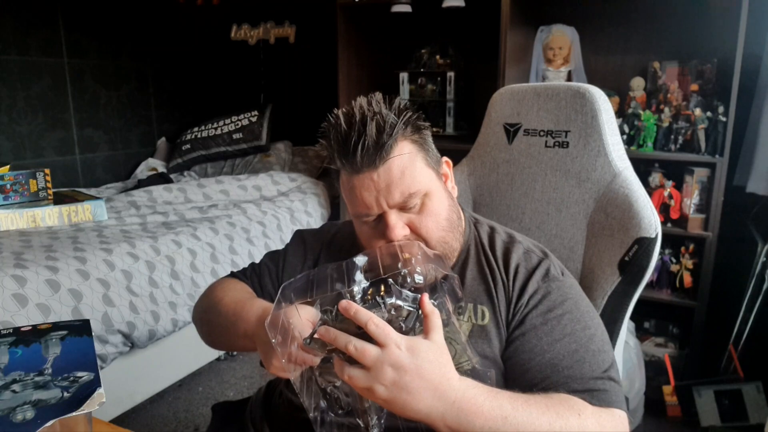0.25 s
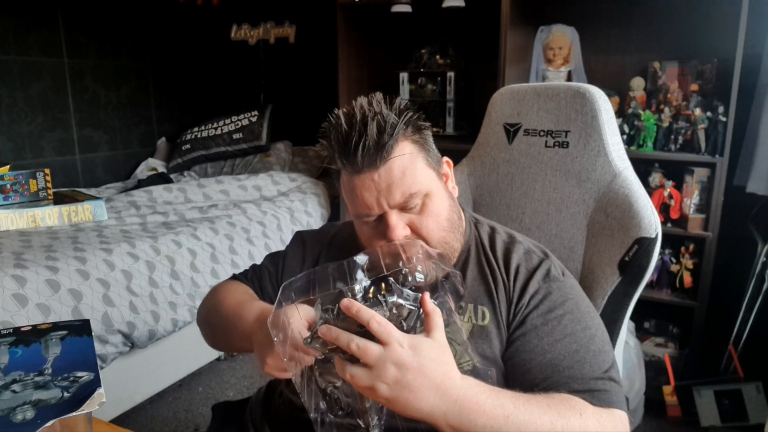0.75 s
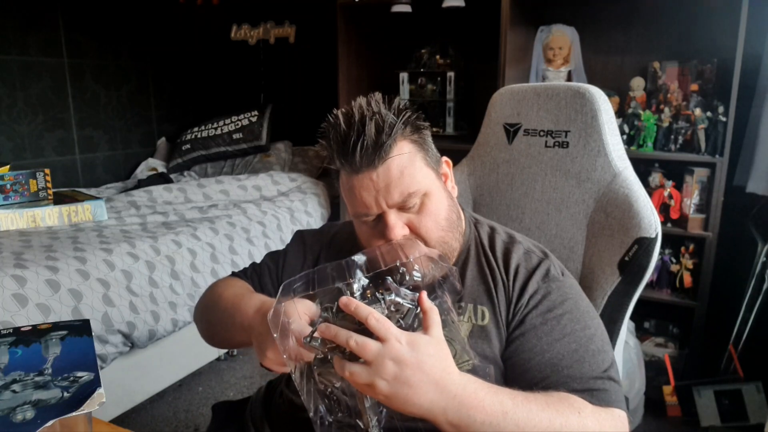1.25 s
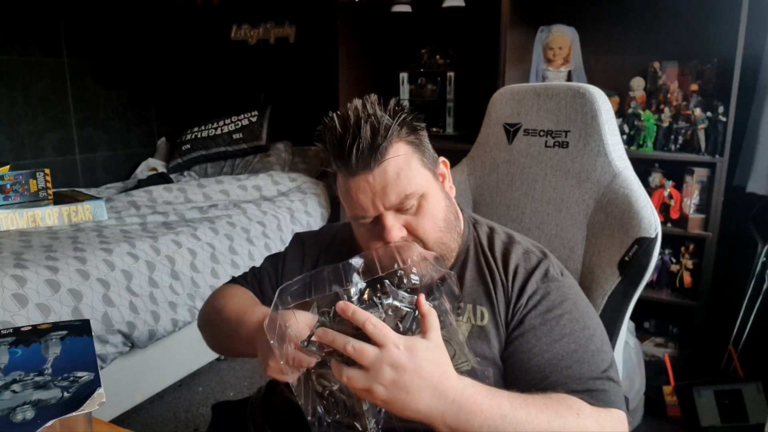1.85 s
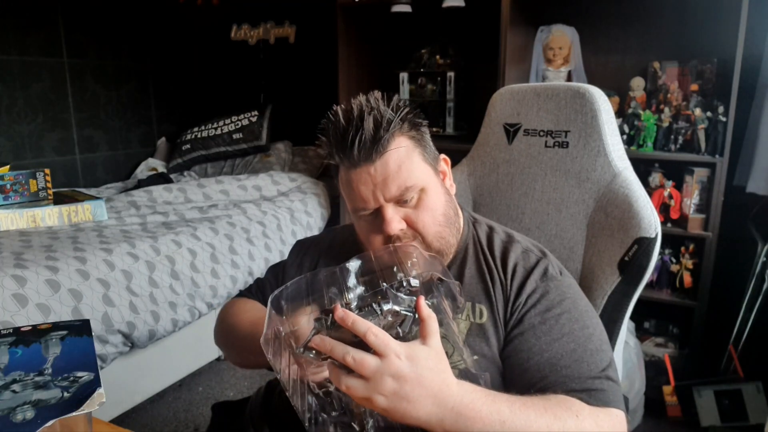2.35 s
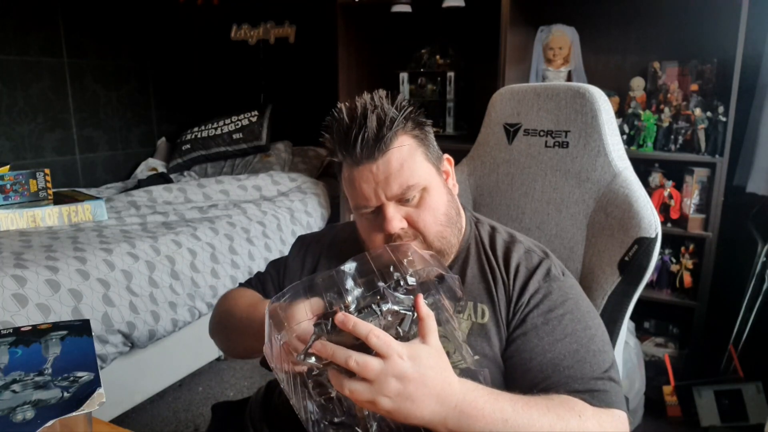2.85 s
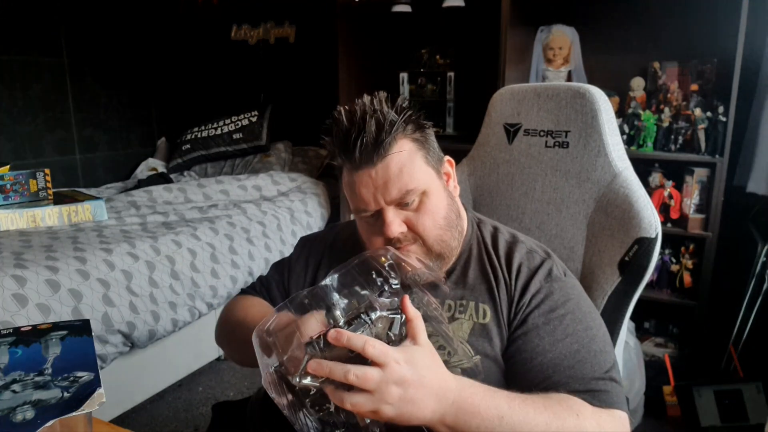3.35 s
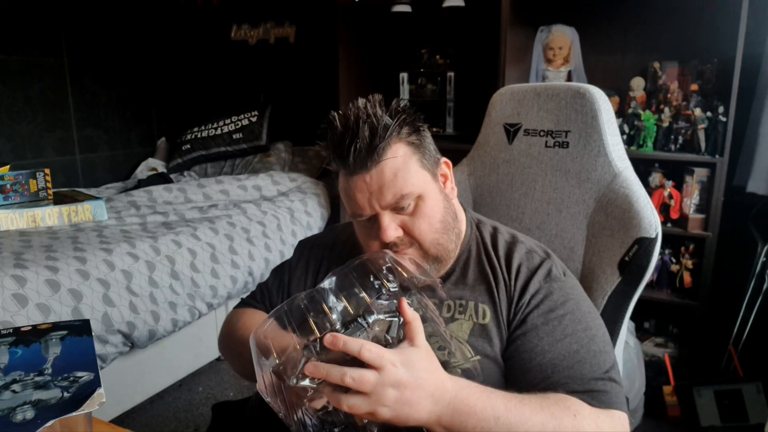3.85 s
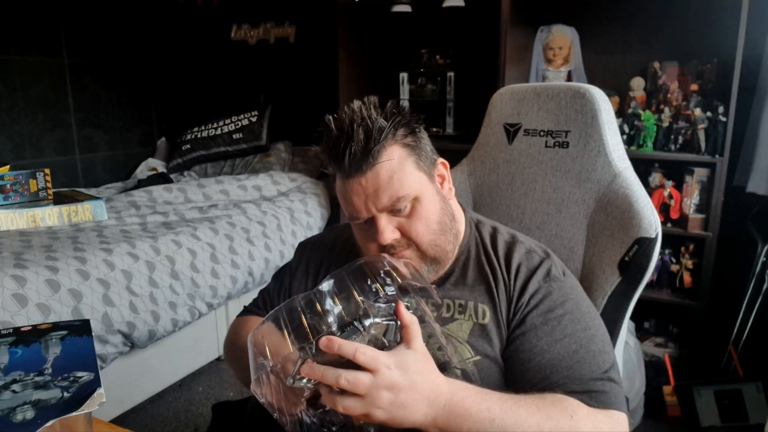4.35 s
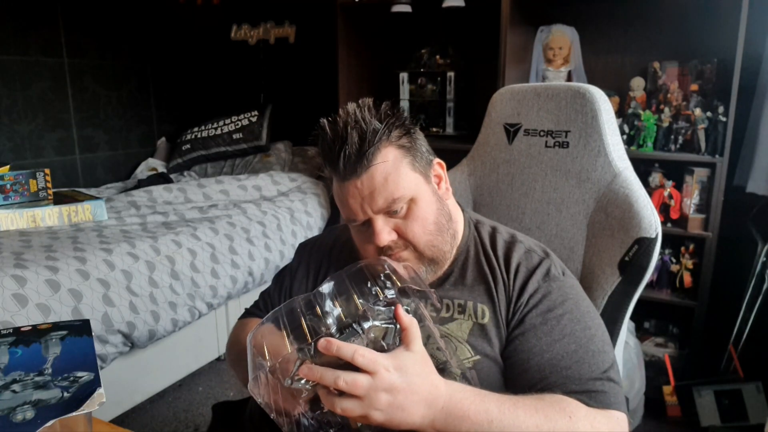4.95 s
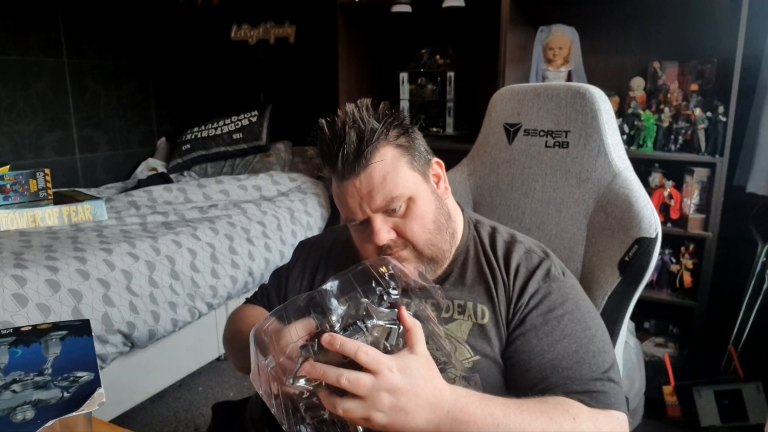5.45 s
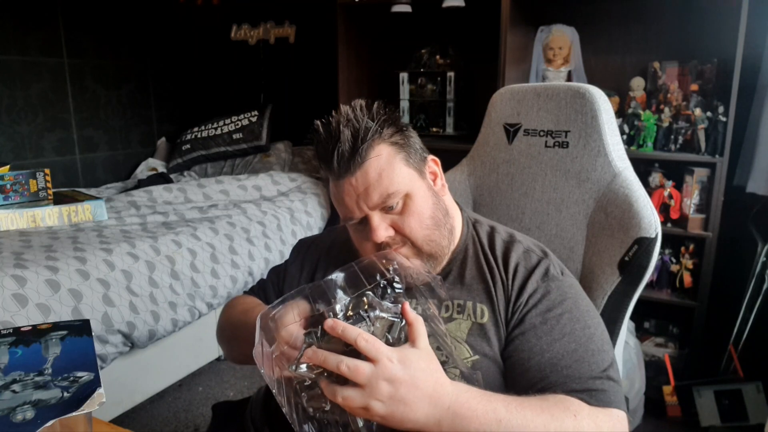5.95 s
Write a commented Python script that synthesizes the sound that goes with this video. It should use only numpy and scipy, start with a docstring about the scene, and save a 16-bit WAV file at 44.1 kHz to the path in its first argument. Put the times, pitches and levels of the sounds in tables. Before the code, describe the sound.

Stiff clear plastic packaging crackles, pops and snaps as it is flexed and cut, close up, over a low computer hum.

```python
"""Cutting open a plastic shell pack

Close up at a desk in a small furnished room, in stereo: a stiff clear pack is gripped, flexed and cut.
Its walls buckle in snaps and dull pops that leave a panel ringing briefly; with each push of the hands
the blade and fingers grate finely on the sheet. A computer and its fans hum in the background."""
import sys
import numpy as np
from scipy import signal
from scipy.fft import rfft, irfft
from scipy.io import wavfile
from scipy.ndimage import map_coordinates

SR = 44100
rng = np.random.default_rng(int(sys.argv[2]) if len(sys.argv) > 2 else 0)


def bounce(signal):
    """Save signal as a 16-bit WAV file at the path given by the first command-line argument."""
    frames = np.transpose(np.atleast_2d(signal))
    limited = np.clip(frames, -1, 1)
    pcm = np.round(limited * 32767).astype(np.int16)
    wavfile.write(sys.argv[1], SR, pcm)


N = 273619
TIME = np.arange(N) / SR
SNAP_TIME, TAIL_TIME = TIME[:int(0.12 * SR)], TIME[:int(0.4 * SR)]
EDGES_HZ = 16000 / 2 ** (np.arange(19, -1, -1) / 2)   # half octaves
SHEET_EDGES_HZ = EDGES_HZ[5:]   # from 125 Hz up


def from_db(db):
    return 10 ** (np.asarray(db) / 20)


def unit_energy(x):
    """Scales each row to a sum of squares of one."""
    return x / np.sqrt(np.sum(x ** 2, axis=-1, keepdims=True) + 1e-20)


def at_hz(points, hz):
    """Reads a table on a log-frequency axis."""
    table = np.array(points)
    return np.interp(np.log(hz), np.log(table[:, 0]), table[:, 1])


def fade(t, t60):
    """Falls by 60 dB in t60 seconds."""
    return np.exp(-np.log(1000) * t / t60)


def mode(t, hz, energy_db, t60):
    """One resonance ringing down."""
    return from_db(energy_db) * unit_energy(np.sin(2 * np.pi * hz * t) * fade(t, t60))


def bands(edges):
    """Yields each band's centre, filter and share of white noise amplitude."""
    for k, (low, high) in enumerate(zip(edges, edges[1:])):
        sos = signal.butter(2, [low, high], "band", fs=SR, output="sos")
        sos[0, :3] *= (-1) ** k   # alternate signs so that neighbours add up
        yield np.sqrt(low * high), sos, np.sqrt(2 * (high - low) / SR)


def drift(per_s):
    """A smooth random curve with a spread near one."""
    knots = rng.standard_normal(1024)
    return map_coordinates(knots, [TIME[::64] * per_s], order=3, mode="wrap").repeat(64)[:N]


def stereo(mid, side, correlation):
    """Left and right with the given correlation."""
    return np.sqrt((1 + correlation) / 2) * mid + np.sqrt((1 - correlation) / 2) * np.array([side, -side])


def add(track, s, sound):
    """Mixes a sound into a track at a given second."""
    start = max(round(s * SR), 0)
    part = sound[..., :N - start]
    track[..., start:start + part.shape[-1]] += part


# The computer, in the background. Each row: pitch in Hz, level in dB, unsteadiness from 0 to 1.
MOTOR_TONES = [(49.8, -63, 0.2), (77.9, -63.5, 0), (120, -57.5, .12), (263.6, -71, 0.4), (363.6, -70, 0),
               (560, -87.5, .4)]


def computer_hum(waver_per_s=7):
    """Motors and fans hum in the centre, some tones steady, some wavering."""
    hum = np.zeros(N)
    for hz, db, unsteady in MOTOR_TONES:
        waver = 1 + unsteady * (drift(waver_per_s) + 1j * drift(waver_per_s))
        tone = np.real(waver * np.exp(2j * np.pi * (hz * TIME + rng.random())))
        hum += from_db(db) * tone / np.sqrt(0.5 + unsteady ** 2)
    return hum


# Room tone around the microphones. Each row: frequency in Hz, spectral level in dB.
ROOM_TONE = [(22, -70), (30, -61), (46, -37), (68, -30.5), (100, -43), (160, -40), (230, -47), (380, -46.5),
             (500, -59.5), (750, -64.5), (1100, -67), (2200, -73), (4400, -76.5), (8000, -87.5),
             (15000, -79.5)]


def room_air(alike_below_hz=900):
    """A dull rush of air, alike at both microphones in the bass and wide above."""
    rush = np.zeros((2, N))
    for hz, sos, share in bands(EDGES_HZ):
        noise = signal.sosfilt(sos, signal.sosfilt(sos, rng.standard_normal((2, N))))
        mid, side = np.sqrt(N) * unit_energy(noise)
        correlation = 0.9 / (1 + (hz / alike_below_hz) ** 2)
        rush += share * from_db(at_hz(ROOM_TONE, hz)) * stereo(mid, side, correlation)
    return rush


# Hands at work near the microphones. Each row: peak time in seconds, grating level in dB at the pack,
# length in seconds.
HAND_PUSHES = [(0.005, -56, 0.14), (0.684, -56.5, 0.29), (1.041, -57.5, 0.57), (1.37, -66, .55),
               (1.563, -55, 0.17), (1.915, -51, 0.12), (3.03, -60.5, 0.5), (3.41, -56.5, 0.33),
               (4.15, -80, 0.17), (4.362, -54, 0.33), (4.968, -52, 0.27), (5.528, -67.5, .38),
               (5.67, -57.5, 0.27), (5.878, -65, 0.18)]


def hand_pressure(hold_db=-86.5, swell_share=0.45, range_db=25):
    """The grating's gain: every push swells and eases again over a light steady hold."""
    gain = from_db(hold_db)
    for peak_s, db, length_s in HAND_PUSHES:
        along = (TIME - peak_s) / length_s
        off_peak = np.maximum(-along / swell_share, along / (1 - swell_share))
        gain = gain + from_db(db - range_db * off_peak)
    return gain


# Blade and fingers on the sheet, close up. Each row: frequency in Hz, relative spectral level in dB.
GRATING_SPECTRUM = [(130, -3.5), (350, 8), (850, 5), (1800, -10), (4000, -15.5), (6500, -21), (8000, -33),
                    (15000, -33.5)]


def grating(slips_per_s=700, size_db=4.0):
    """Tiny slips of the blade and fingers, in clumps, each a click coloured by the sheet."""
    slipping = rng.random(N) < slips_per_s * from_db(4 * drift(per_s=45)) / SR
    sizes = from_db(size_db * np.minimum(rng.exponential(1, N), 4)) * rng.choice([-1, 1], N)
    slips = slipping * sizes + 1e-18
    grains = sum(from_db(at_hz(GRATING_SPECTRUM, hz)) * signal.sosfilt(sos, slips)
                 for hz, sos, _ in bands(SHEET_EDGES_HZ))
    return np.sqrt(N) * unit_energy(grains) * hand_pressure()


def rattle(t60):
    """Bending waves dying in the sheet, so many that they favour no pitch."""
    half_fade = fade(SNAP_TIME, 2 * t60)   # applied before and after flattening
    length = len(SNAP_TIME)
    spectrum = rfft(rng.standard_normal(length) * half_fade, 2 * length)
    flattened = irfft(spectrum / (np.abs(spectrum) + 1e-9))[:length]
    return flattened * half_fade


# What the sheet radiates towards the microphones in every buckle. Each row: frequency in Hz, gain in dB.
SHEET_RADIATION = [(130, -14), (200, -2.5), (270, -7.5), (380, 2.5), (550, -2.5), (800, -2), (1500, -5),
                   (2400, -4.5), (4300, -4), (6000, 0), (7600, -10), (11000, 0.5), (15000, -3)]


def wall_flip(colour, rattle_t60, kick_share=0.14, kick_s=0.0001, rise_s=0.00056):
    """A kick, stronger the faster the wall flips, then a rattle through the sheet."""
    softness = (rattle_t60 / 0.025) ** 2
    swell = 1 - np.exp(-SNAP_TIME / (rise_s * softness))   # a slow flex also starts slowly
    kick = kick_share / softness * unit_energy(np.exp(-SNAP_TIME / kick_s))
    force = kick + unit_energy(rattle(rattle_t60) * swell)
    snap = 0
    for hz, sos, share in bands(SHEET_EDGES_HZ):
        band_db = at_hz(colour, hz) + at_hz(SHEET_RADIATION, hz)
        snap = snap + share * from_db(band_db) * unit_energy(signal.sosfilt(sos, force))
    return snap


# One panel, close up. Each row: multiple of its lowest mode, relative level in dB, t60 in seconds.
PANEL_MODES = [(1, -14, 0.049), (2.1, -22, .04), (3.55, -23, .036)]


def panel_ring(lowest_hz, colour, blow_db, loss_per_db=0.23):
    """The flipped wall rings on; a harder buckle goes more into rattle than into ring."""
    ring = 0
    for multiple, mode_db, t60 in PANEL_MODES:
        hz = multiple * lowest_hz
        ring = ring + mode(SNAP_TIME, hz, at_hz(colour, hz) + mode_db - loss_per_db * blow_db, t60)
    return ring


# The tone of a buckle is set at four points: body, middle, crack and air, each a frequency in Hz.
COLOUR_POINTS_HZ = [430, 1150, 3300, 10000]
# The pack buckling in front of the microphones. Each row: start in seconds, level of the middle in dB,
# body, crack and air in dB against that level, lowest panel mode in Hz, left over right in dB,
# rattle t60 in seconds (short for a snap, long for a soft flex).
BUCKLES = [(0.064, -25, -2, -6.5, -37, 377, -0.5, 0.041),
           (0.4436, 15.5, -2.5, -3.5, -25.5, 488, -0.5, 0.048), (0.578, -1.5, 1, -5.5, -24, 425, 0, 0.039),
           (0.649, 9.5, 1.5, -17, -35.5, 417, 0.5, 0.032), (0.7067, -3, -6, -21, -44, 360, -10, .06),
           (0.721, -3.5, -0.5, -25, -44, 380, 1, .04), (0.758, -9.5, 2, -27, -43, 367, 9, 0.052),
           (0.856, -21, 4.5, -12, -34, 313, 1, 0.056), (0.9085, -12, 11, -63, -46, 780, 1, 0.022),
           (0.997, -10.5, 1.5, -8.5, -40, 490, 0, 0.044), (1.0569, -10, 12.5, -4, -38, 406, 0, 0.034),
           (1.0681, 2.5, 2.5, -14, -33.5, 841, -3, 0.034), (1.098, -7.5, -1, -4, -28, 455, -4, 0.018),
           (1.2448, -19.5, 2, -12, -32, 365, -1, 0.035), (1.333, -13.5, -4, 0, -14, 381, -5, 0.051),
           (1.53, -14, 4.5, -30, -45, 388, 1, 0.024), (1.57, -2.5, -1, -7.5, -31, 332, -1, 0.039),
           (1.7853, 7, 4.5, 1, -15.5, 429, -1, 0.052), (1.7906, 8.5, -6, -20, -34, 484, 3, 0.037),
           (1.87, 12, -11, -6.5, -19, 845, 2.5, 0.026), (1.911, 8.5, 0, -11.5, -31, 806, 2, 0.067),
           (1.9261, 10, 4, -6, -29.5, 402, 1, 0.021), (1.932, 11.5, -23, -25, -46.5, 756, 19, 0.06),
           (2.976, -11, 2.5, -17, -41, 334, 0, 0.036), (3.0476, -2, -7.5, -25.5, -52, 380, -2, 0.034),
           (3.098, -3, -4, -20, -48, 365, -6, 0.032), (3.3613, -6, 7, -7.5, -28.5, 360, -0.5, 0.05),
           (3.442, -10.5, 9, -14, -52, 385, -2.5, 0.051), (3.542, -15.5, 12, -17, -44, 375, -4, 0.096),
           (3.671, -35, 21.5, -16, -40, 360, 0, 0.068), (4.1291, -23, 5, -21, -47, 361, 7, 0.088),
           (4.261, -16.5, 1.5, -13, -33, 325, 0, 0.038), (4.281, -8.5, -2, -16, -43, 370, 1, 0.087),
           (4.3291, 0.5, -1.5, -19, -46, 716, 2, 0.029), (4.347, -4.5, 2, -4.5, -34, 395, -1, 0.04),
           (4.3577, -1, 3, -13, -45, 376, 4, 0.034), (4.38, -5.5, 4, -17, -36, 392, 0, .095),
           (4.4005, -4, -2.5, -9.5, -39, 747, -2.5, 0.035), (4.424, -15, -1, -12, -41, 803, -10, .03),
           (4.832, -18.5, 5, -49, -50, 378, -1, 0.053), (4.9225, -12.5, 5, -11, -30, 737, -2, 0.056),
           (4.938, 2.5, 2, -15.5, -35.5, 678, 5, 0.069), (4.967, 23.5, -1.5, 1, -23.5, 704, 1, .021),
           (5.247, -23, -0.5, -1, -16.5, 489, -9, 0.081), (5.505, -25.5, 5.5, -21, -41, 370, 3, .07),
           (5.6495, -3, 5, -13, -36, 614, -3.5, 0.047), (5.664, -7.5, 10.5, -20, -40, 625, 3.5, .043),
           (5.722, -15, 1, -11, -28, 659, 2, 0.024), (5.8458, -8, 6, -24.5, -47.5, 324, -3.5, .04),
           (5.91, -21, 5.5, -17, -40, 337, -1, .03), (6.133, -20.5, 7.5, -13, -36.5, 456.5, 2, .075)]


def buckles():
    """Each wall flips and rings; yields the start, level, balance and sound."""
    for start_s, db, body_db, crack_db, air_db, panel_hz, pan_db, rattle_t60 in BUCKLES:
        colour = list(zip(COLOUR_POINTS_HZ, db + np.array([body_db, 0, crack_db, air_db])))
        yield start_s, db, pan_db, wall_flip(colour, rattle_t60) + panel_ring(panel_hz, colour, db)


# The whole shell, close up. Each row: pitch in Hz, relative level in dB, t60 in seconds.
SHELL_MODES = [(469, -17.5, 0.12), (652, -29.5, 0.33), (729, -22, 0.14), (805, -23, 0.16),
               (1019, -30, 0.18), (1620, -35, 0.26), (2530, -22.5, 0.13), (2577, -24, .16),
               (3410, -28, .14), (3700, -30.5, 0.11), (4040, -32.5, 0.095), (4634, -33, .12),
               (5190, -37, .12)]


def shell_ring(blow_db, hard_blow_db=23, hard_ring_db=18, steepness=1.7):
    """The shell rings, disproportionately after a hard blow; each mode radiates its own way."""
    ring_db = hard_ring_db + steepness * (blow_db - hard_blow_db)
    ring = 0
    for hz, mode_db, t60 in SHELL_MODES:
        balance = from_db(rng.normal(0, 0.67) * np.array([[1], [-1]]))
        ring = ring + balance * mode(TAIL_TIME, hz, ring_db + mode_db, t60)
    return ring


# Faint creaks and squeaks at the blade, in the centre. Each row: midpoint in seconds, length in seconds,
# pitch in Hz, resonance width in Hz, level in dB at the pack.
BLADE_CREAKS = [(0.723, 0.047, 1410, 400, -63), (0.918, 0.098, 5200, 454, -89),
                (1.268, 0.11, 2480, 1500, -74.5), (1.562, 0.038, 3400, 400, -71),
                (3.08, 0.13, 1360, 240, -63.5), (3.139, 0.27, 1830, 220, -77.5),
                (4.413, 0.1, 900, 110, -59)]


def creaks():
    """Plastic sticks and slips unevenly on the blade, driving one resonance that swells and dies away."""
    track = np.zeros(N)
    for middle_s, length_s, hz, width_hz, db in BLADE_CREAKS:
        radius = np.exp(-np.pi * width_hz / SR)
        resonance = [1, 0, -1], [1, -2 * radius * np.cos(2 * np.pi * hz / SR), radius ** 2]
        slips = rng.standard_normal(int(length_s * SR))
        tone = signal.lfilter(*resonance, signal.lfilter(*resonance, slips))
        creak = np.sqrt(len(tone)) * unit_energy(tone * np.hanning(len(tone)))
        add(track, middle_s - length_s / 2, from_db(db) * creak)
    return track


def near_echoes(x, t60=0.024, echo_db=-0.5, above_hz=520):
    """Sound from the wide sheet and the desk reaches the two microphones differently, above the bass."""
    paths = unit_energy(rng.standard_normal(len(SNAP_TIME)) * fade(SNAP_TIME, t60))
    paths = signal.sosfilt(signal.butter(2, above_hz, "high", fs=SR, output="sos"), paths)
    side = from_db(echo_db) * signal.fftconvolve(x, paths)[:N]
    return np.array([side, -side])


# Sheet and small room dying away together. Each row: frequency in Hz, t60 in seconds.
TAIL_DECAY = [(130, .28), (400, 0.12), (1000, 0.18), (3000, 0.18), (6000, 0.19), (14000, 0.16)]
# That tail at the two microphones. Each row: frequency in Hz, correlation from 0 to 1.
TAIL_CORRELATION = [(130, .95), (300, 0.5), (600, 0.5), (1500, 0), (5000, 1), (14000, 0.06)]


def room_tail(x, build_s=0.0074, tail_db=-4.5):
    """Reflections thicken over the first hundredths of a second and die quickly among bed and shelves."""
    reflections = rng.standard_normal((2, len(TAIL_TIME))) * (1 - np.exp(-TAIL_TIME / build_s))
    response = 0
    for hz, sos, share in bands(SHEET_EDGES_HZ):
        dying = reflections * fade(TAIL_TIME, at_hz(TAIL_DECAY, hz))
        mid, side = unit_energy(signal.sosfilt(sos, dying))
        response = response + share * stereo(mid, side, at_hz(TAIL_CORRELATION, hz))
    return from_db(tail_db) * signal.fftconvolve(x[None], response, axes=1)[:, :N]


def pack(direct_db=-3.5, snap_send_db=-4, wakes_shell_db=0):
    """Grating, creaks and buckles, direct and through the room; hard buckles wake the whole shell."""
    to_room = grating() + creaks()
    direct, ringing = np.array([to_room, to_room]), np.zeros((2, N))
    for start_s, db, pan_db, snap in buckles():
        add(direct, start_s, snap * from_db([[pan_db / 2], [-pan_db / 2]]))
        add(to_room, start_s, snap * from_db(snap_send_db))
        if db > wakes_shell_db:
            add(ringing, start_s, shell_ring(db))
    close = direct + near_echoes(direct.mean(axis=0))
    return from_db(direct_db) * close + ringing + room_tail(to_room)


# Notches from the desk top, at the microphones. Each row: centre in Hz, width in Hz, depth from 0 to 1.
DESK_NOTCHES = [(253, 50, 0.8), (512, 41, 0.9)]


def desk_reflection(x):
    """Narrow dips where the direct sound and its reflection meet out of step."""
    for hz, width_hz, depth in DESK_NOTCHES:
        x = x - depth * signal.lfilter(*signal.iirpeak(hz, hz / width_hz, fs=SR), x)
    return x


def scene():
    """The pack over the desk, with the computer and the room's air behind it."""
    return desk_reflection(pack()) + computer_hum() + room_air()


def record(dry, microphone_hz=13000, cutoff_hz=16100):
    """The microphones lose the very top; peaks are rounded off near full scale, then steeply low-passed."""
    heard = signal.sosfilt(signal.butter(3, microphone_hz, fs=SR, output="sos"), dry)
    rounded = heard / (1 + heard ** 4) ** (1 / 4)
    return signal.sosfilt(signal.ellip(10, 0.1, 70, cutoff_hz, fs=SR, output="sos"), rounded)


dry = scene()
out = record(dry)
bounce(out)
```